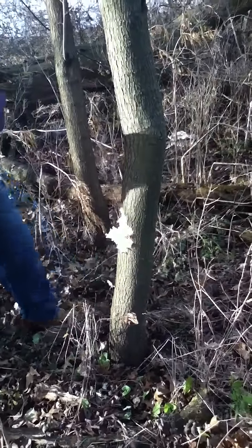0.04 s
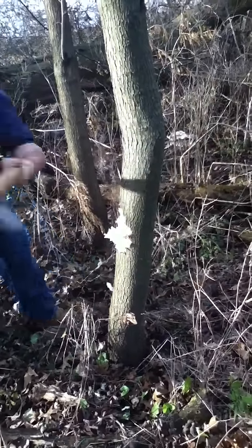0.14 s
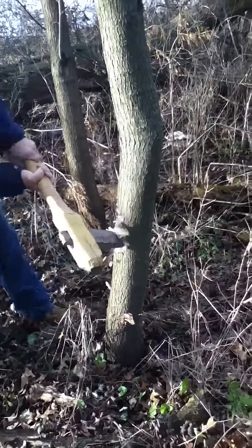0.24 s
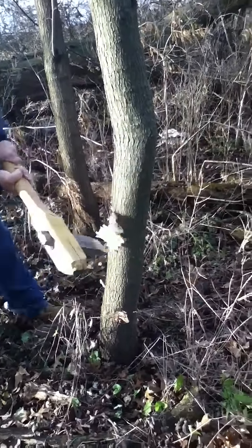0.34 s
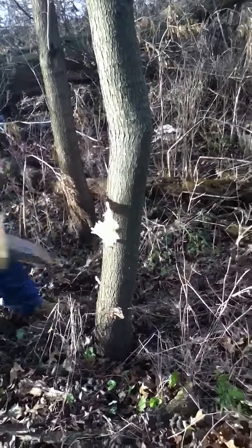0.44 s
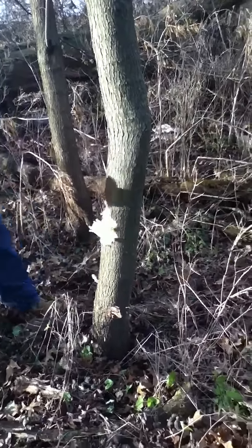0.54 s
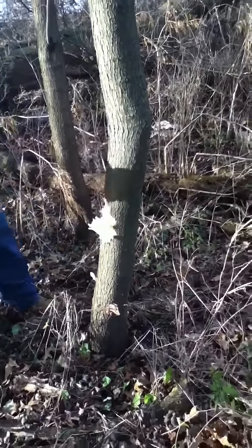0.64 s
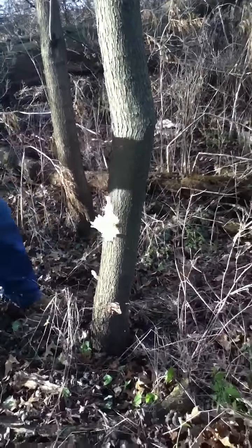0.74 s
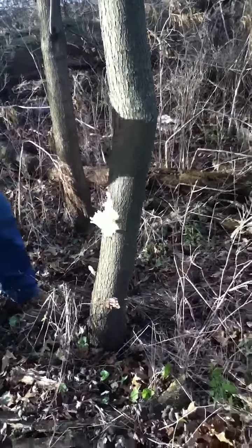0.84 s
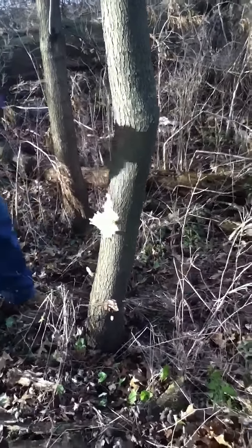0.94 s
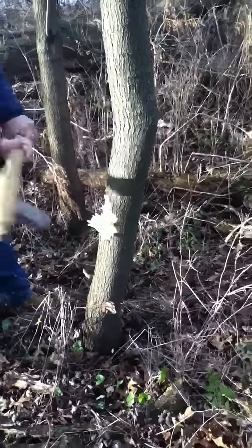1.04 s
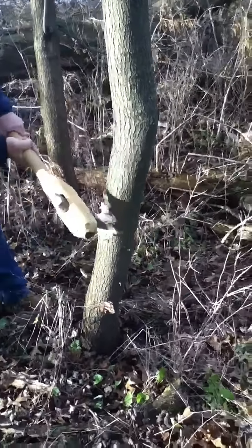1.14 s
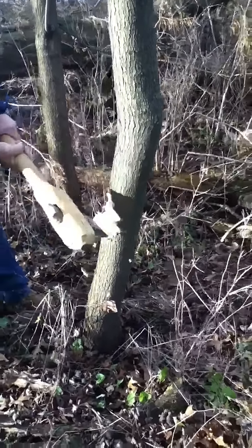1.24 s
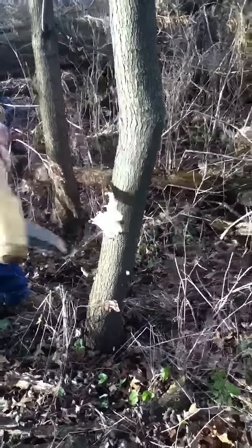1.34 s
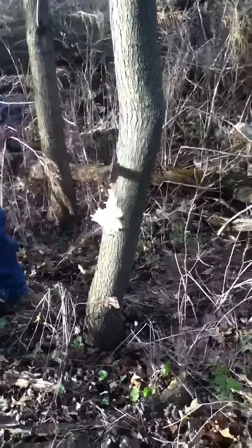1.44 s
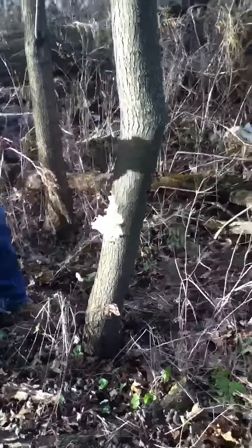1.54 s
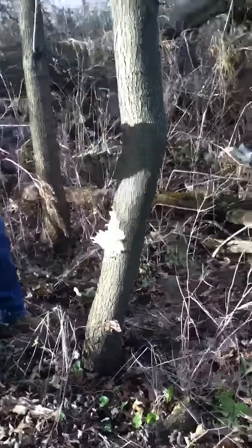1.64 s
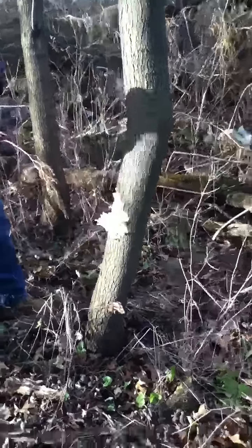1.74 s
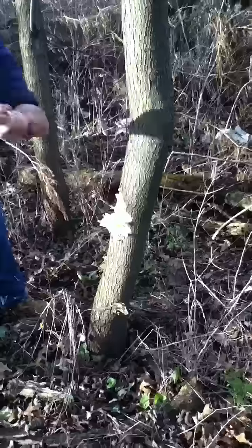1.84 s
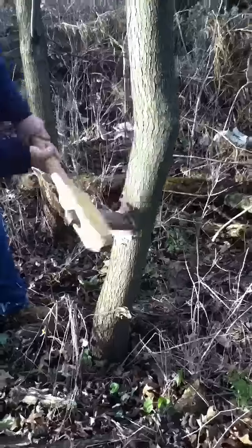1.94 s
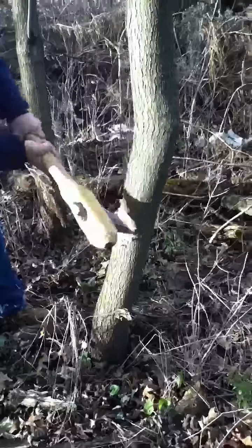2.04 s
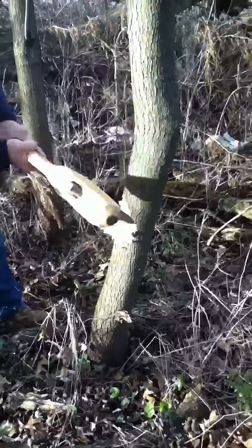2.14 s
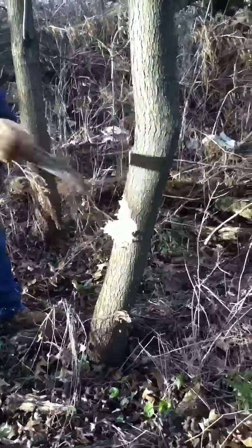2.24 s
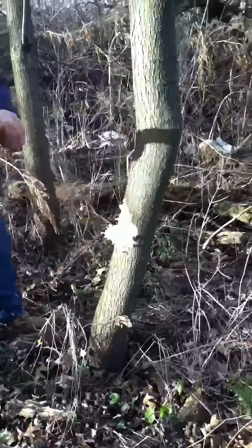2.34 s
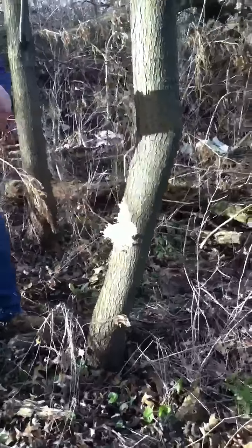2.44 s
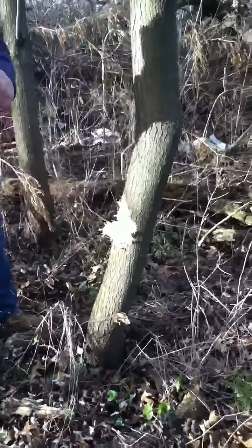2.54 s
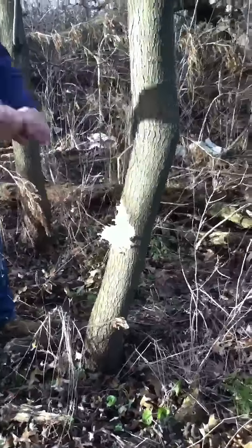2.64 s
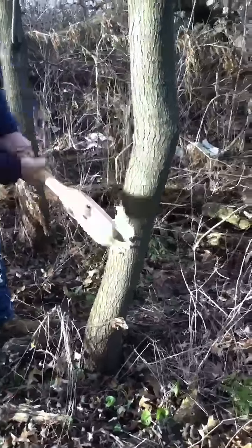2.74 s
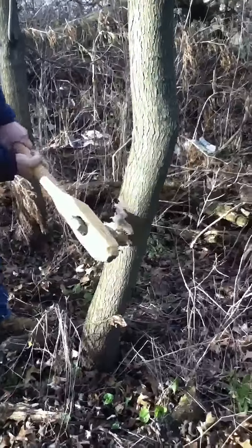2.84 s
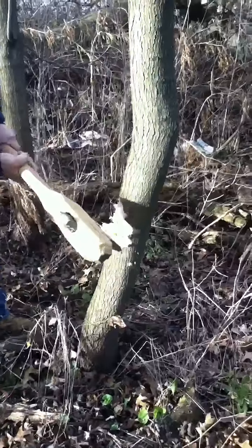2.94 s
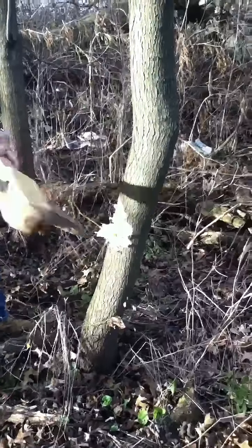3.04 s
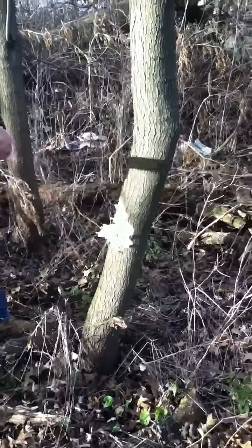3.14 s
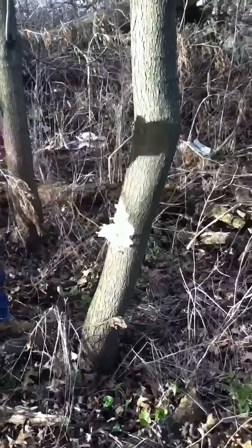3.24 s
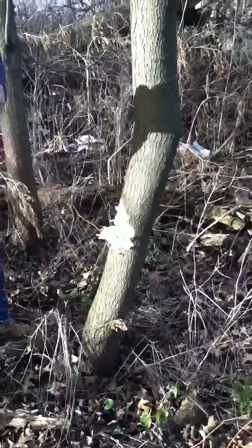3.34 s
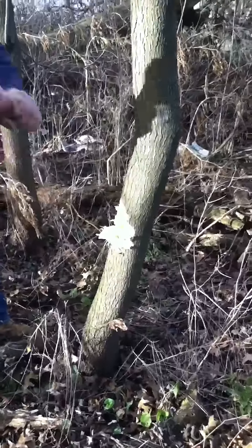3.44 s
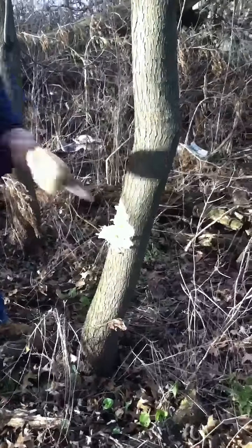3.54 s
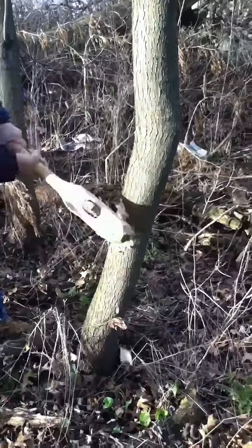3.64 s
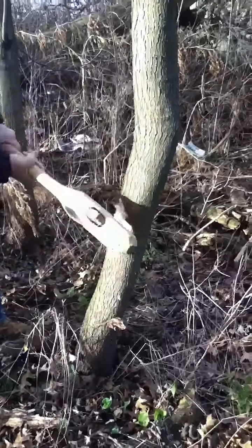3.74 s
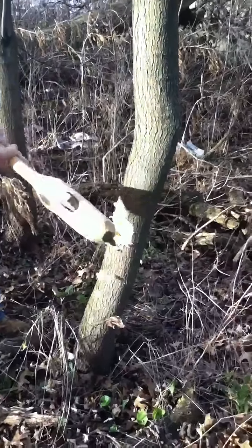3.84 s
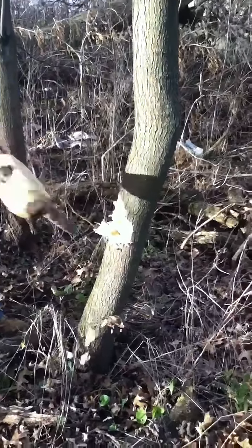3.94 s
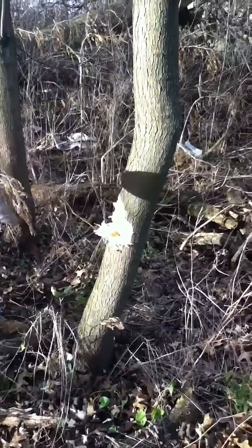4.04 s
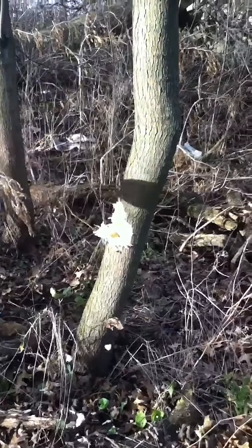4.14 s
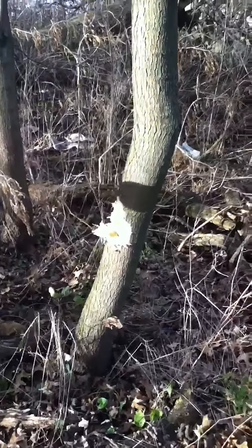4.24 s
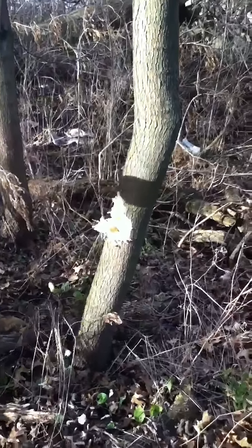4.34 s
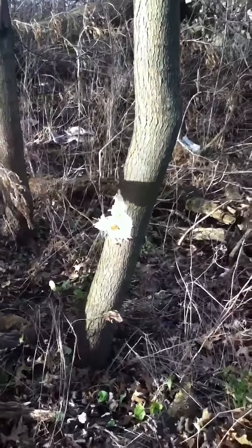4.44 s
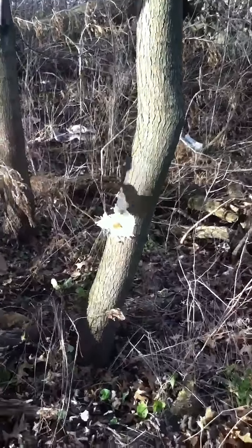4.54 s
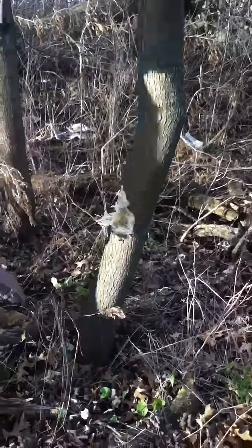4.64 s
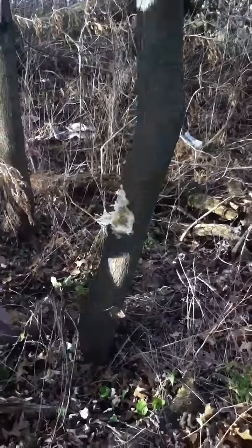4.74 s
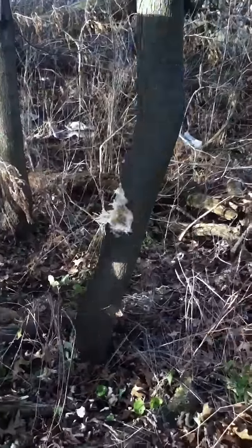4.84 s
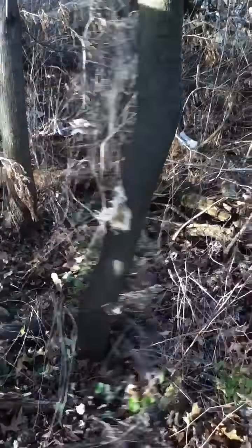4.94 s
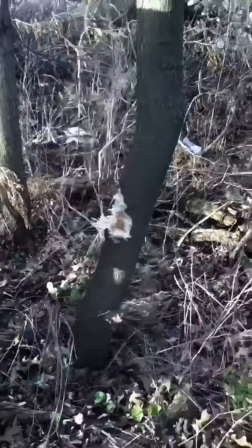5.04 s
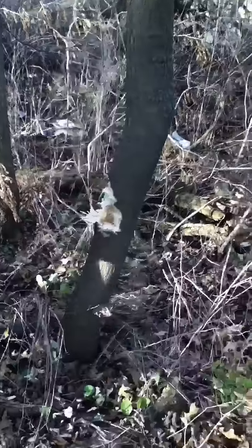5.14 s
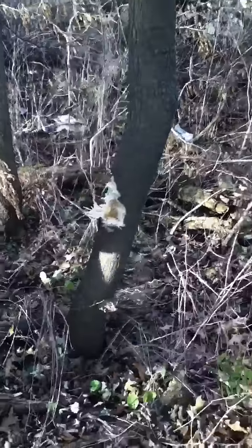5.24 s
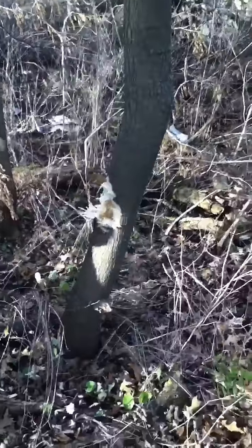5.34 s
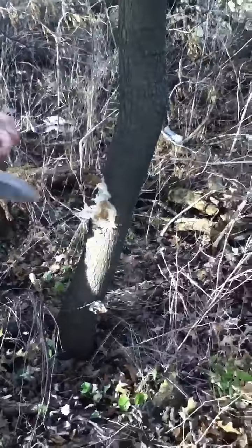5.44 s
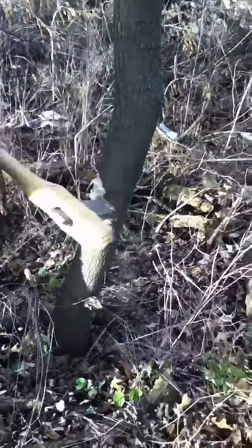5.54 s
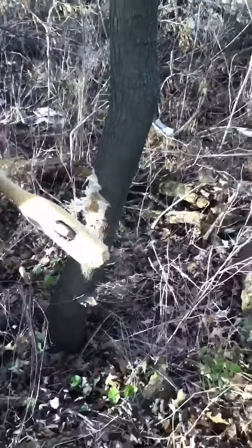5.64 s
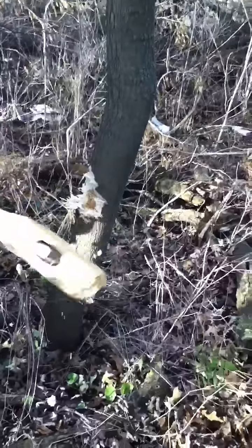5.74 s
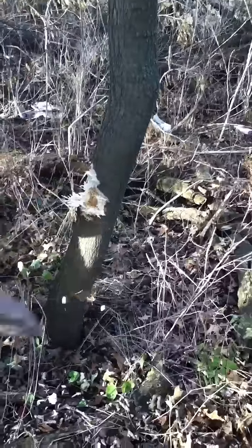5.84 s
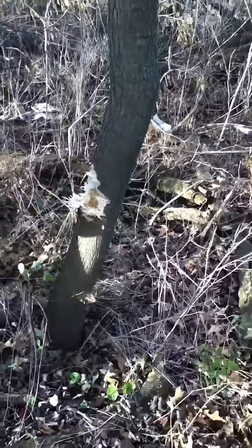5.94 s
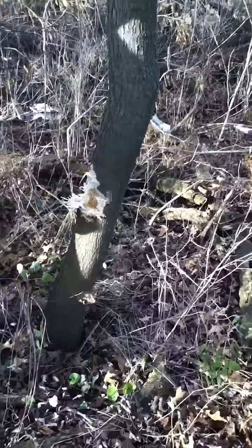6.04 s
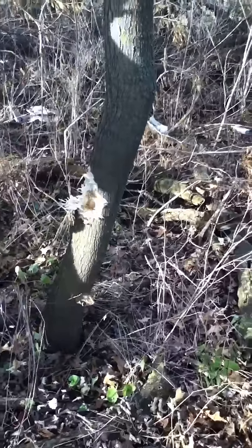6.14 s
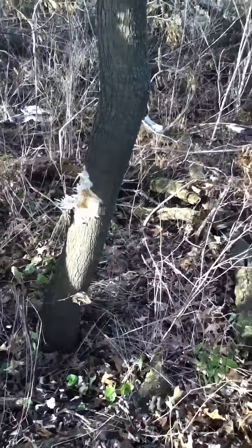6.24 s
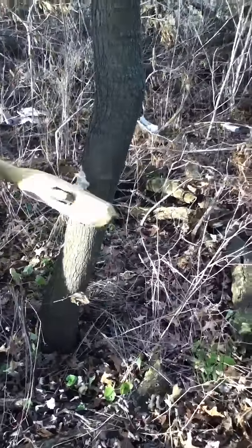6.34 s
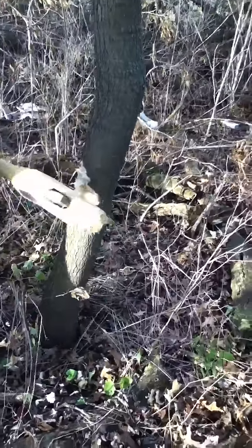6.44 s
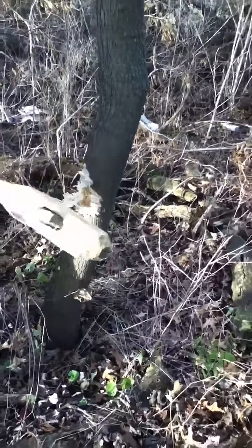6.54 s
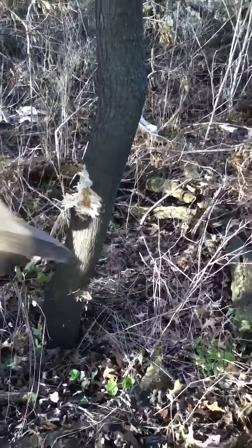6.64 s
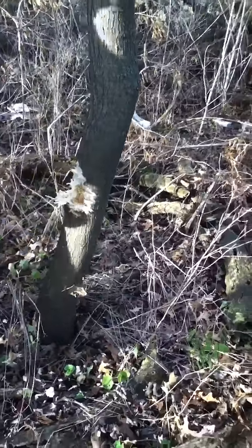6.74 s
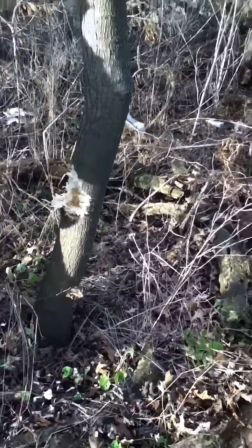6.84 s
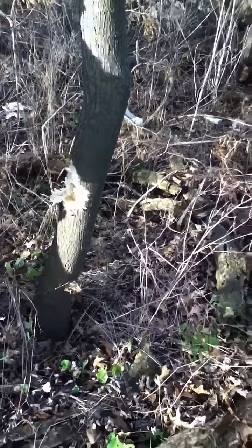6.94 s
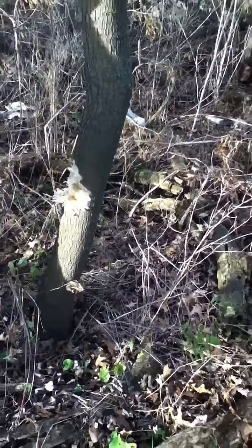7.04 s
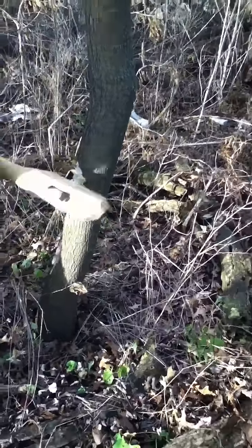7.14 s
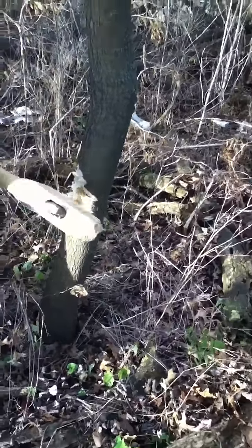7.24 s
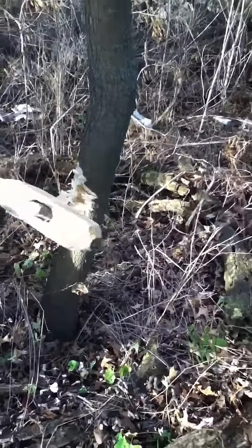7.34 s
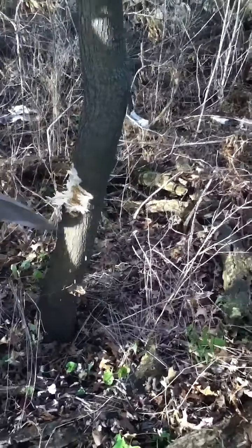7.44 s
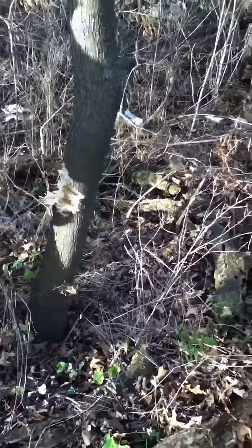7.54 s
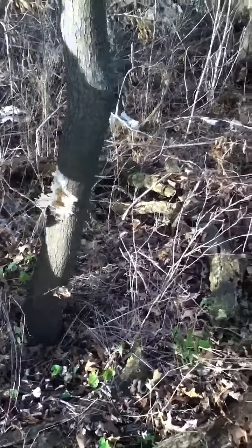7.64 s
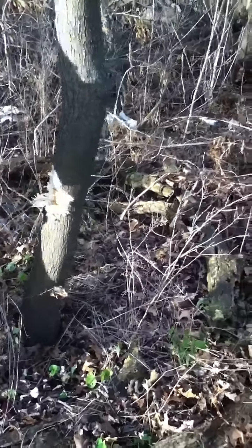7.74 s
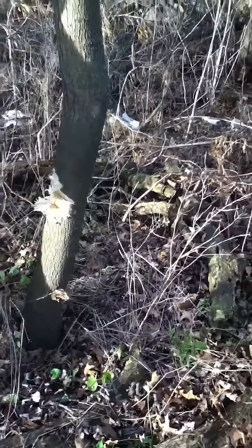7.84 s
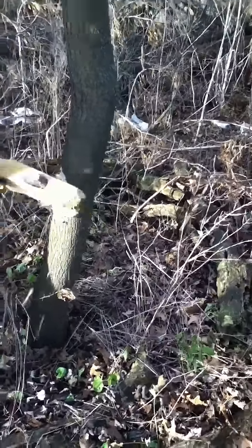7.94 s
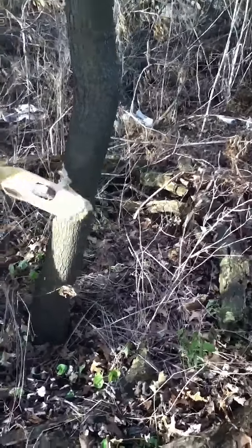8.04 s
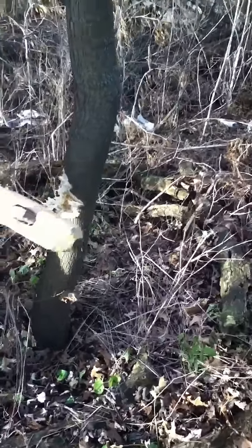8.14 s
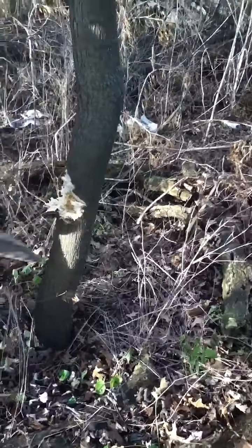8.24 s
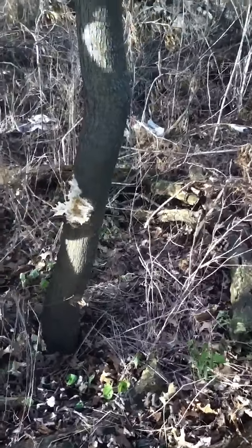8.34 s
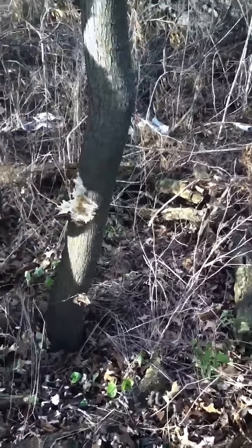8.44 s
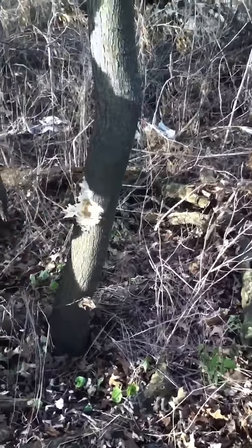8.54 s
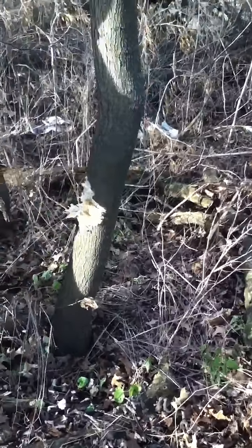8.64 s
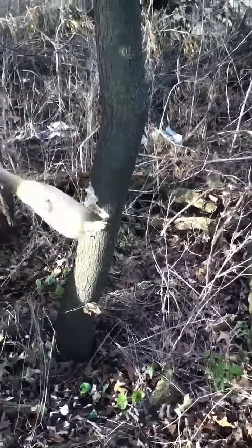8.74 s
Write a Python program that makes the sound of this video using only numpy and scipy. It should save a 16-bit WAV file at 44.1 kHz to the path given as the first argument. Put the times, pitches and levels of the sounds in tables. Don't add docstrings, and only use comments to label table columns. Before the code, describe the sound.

Close in quiet woodland, an axe bites a small trunk with five loud, short, woody knocks at a steady pace, the fifth softer. A pause follows, filled with feet dragging through dry leaves and brittle twig snaps, then four more blows, more splintery at first. Chips tick and patter down after the hits. Faint traffic hum lies behind; a phone two metres away slightly flattens the peaks.

```python
import sys
import numpy as np
from scipy import signal
from scipy.fft import rfft, irfft
from scipy.io import wavfile
from scipy.ndimage import uniform_filter1d

SR = 44100
rng = np.random.default_rng(int(sys.argv[2]) if len(sys.argv) > 2 else 0)


def decibels_to_gain(level_db):
    exponent = np.asarray(level_db, float) / 20
    return 10 ** exponent


def master_out(mix):
    frames = np.transpose(np.atleast_2d(mix))
    ceiling = np.clip(frames, -1, 1)
    pcm = np.round(ceiling * 32767).astype(np.int16)
    wavfile.write(sys.argv[1], SR, pcm)


N = 387198

# start_s, peak_db, haft_hz, blade_hz, splinter_db (re peak)
BLOWS = [
    (.3610, -0.5, 870, 1600, -24.5),
    (1.2139, -1, 950, 1645, -24),
    (2.0586, 0, 1043, 1814, -23.5),
    (2.8840, -3.5, 629, 1430, -20.5),
    (3.7117, -6.5, 1050, 1700, -14),
    (5.6510, -0.5, 866, 1405, -9.5),
    (6.4698, -4, 862, 1414, -6.5),
    (7.2664, -3.5, 846, 1294, -20),
    (8.0515, -1.5, 920, 1486, -14.5),
]


def unit(x):
    return x / np.sqrt(np.mean(x ** 2))


def curve(table):
    s, *columns = np.transpose(table)
    return [np.interp(np.arange(N) / SR, s, c) for c in columns]


def colour(x, table):
    hz, db = np.transpose(table)
    log_hz = np.log(np.arange(1, len(x) // 2 + 2) * SR / len(x))
    gain = decibels_to_gain(np.interp(log_hz, np.log(hz), db, right=-80))
    return unit(irfft(rfft(x) * gain, len(x)))


def band(x, hz, width):
    b, a = signal.iirpeak(min(hz, .4 * SR), 1 / max(width, .02), SR)
    return signal.lfilter(b, a, x)


def ring(hz, t60, sag=0., size=8192):
    t = np.arange(size) / SR
    turns = np.cumsum(hz * (1 - sag * np.clip(t / .002, 0, 1.5))) / SR
    return np.sin(2 * np.pi * turns) * np.exp(-np.log(1000) * t / t60)


def add(out, s, x):
    i = int(s * SR)
    out[i:i + len(x)] += x[:N - i]


def walk(rate):
    k = int(SR / rate)
    steps = np.repeat(rng.standard_normal(N // k + 1), k)
    return unit(uniform_filter1d(uniform_filter1d(steps, k), k)[:N])


def burst(hz, width, rise, t60, grit_db, size=4096):
    t = np.arange(size) / SR
    grains = rng.standard_normal(size) * decibels_to_gain(grit_db * rng.exponential(size=size))
    envelope = (1 - np.exp(-t / rise)) * np.exp(-np.log(1000) * t / t60)
    x = band(grains * envelope, hz, width)
    return x / np.abs(x).max()


def distance():
    # pitch_hz, density_db (per Hz)
    air_spectrum = [(13, -59), (22, -20), (74, -4.5), (454, -10), (535, -12.5), (649, -11), (1010, -14.5),
                    (1290, -16), (1520, -17.5), (1750, -13.5), (3480, -17), (6370, -13.5), (15800, -21.5)]
    # time_s, level_db
    hum_levels = [(0, -62.5), (.27, -59.5), (.78, -70), (1.15, -67), (1.5, -71), (1.96, -62.5),
                  (2.37, -67.5), (3.3, -68), (4.5, -67), (4.85, -61), (5.5, -61), (5.95, -69), (6.58, -62),
                  (6.89, -69), (7.3, -65), (7.6, -70), (8.78, -67)]
    air = colour(rng.standard_normal(N), air_spectrum) * decibels_to_gain(-55.5)
    low = signal.sosfilt(signal.butter(2, 170, fs=SR, output="sos"), air)
    swell, flutter = decibels_to_gain(.7 * walk(5)), decibels_to_gain(2.5 * walk(9))
    hum = unit(low) * decibels_to_gain(curve(hum_levels)[0] + 5.0) * flutter
    return (air - low) * decibels_to_gain(-1.5) * swell + hum


def treading():
    # peak_s, peak_db, swell_s (over 20 dB), fade_s (over 20 dB)
    scuffs = [(0.123, -25.5, 0.3, 0.1169), (.34, -44.5, 0.1, .25), (.65, -52, 0.1, 0.2),
              (.96, -44, .38, 0.06), (1.04, -42.5, .07, 0.18), (1.655, -49, 0.13, .05),
              (1.726, -48.5, .11, .15), (1.894, -54.5, 0.2, 0.3), (2.034, -50, .18, .03),
              (2.52, -57.5, 0.3, 1.2), (3.295, -51.5, 0.07, .1), (3.358, -47.5, .08, .04),
              (3.56, -57, 0.1, 0.2), (4.19, -46.5, .5, 0.8), (4.3, -44.5, .04, 0.3),
              (4.485, -35.5, 0.26, 0.13), (4.669, -29, 0.1161, 0.19), (4.789, -28.5, .3, .045),
              (5.063, -32, 0.25, 0.2951), (5.363, -38.5, 0.1, 0.42), (5.545, -46, 0.2, 0.22),
              (6.1, -47, 0.1, 0.04), (6.42, -53, .55, 0.4), (6.594, -44, 0.1, 0.12), (6.858, -43, .18, .26),
              (7.22, -55, 0, 0.5), (7.49, -44.5, .08, 0.38), (7.85, -39, .1, 0.31),
              (7.968, -31.5, 0.2047, .075), (8.6, -57.5, .5, 0.2)]
    still_db = -69.5
    lag_s, shower_db, swell_s, fade_s = .06, -52, 0.082, .27
    showers = [(blow[0] + lag_s, shower_db, swell_s, fade_s) for blow in BLOWS]
    t = np.arange(0, N + 64, 64) / SR
    power = decibels_to_gain(2 * still_db)
    for s, db, swell, fade in [*scuffs, *showers]:
        drop_db = 20 * np.maximum((s - t) / swell, (t - s) / fade)
        power = power + decibels_to_gain(2 * db - 2 * drop_db)
    return np.interp(np.arange(N) / SR, t, 10 * np.log10(power))


def leaf_grains(grit_db):
    return rng.standard_normal(N) * decibels_to_gain(grit_db * uniform_filter1d(rng.exponential(size=N), size=9))


def leaves():
    # pitch_hz, density_db (per Hz)
    leaf_spectrum = [(88, -42), (150, -11.5), (354, -9), (421, -10.5), (575, -7), (771, -10), (1070, -7.5),
                     (1470, -7), (3590, -4.5), (8810, -8.5), (15800, -14.5)]
    level_db = treading()
    crackle = colour(leaf_grains(6.0) * decibels_to_gain(1.0 * walk(70)), leaf_spectrum)
    bright = unit(band(crackle, 7800, 1.39))
    patches = decibels_to_gain(1.5 * walk(50))
    heavy_db = -8 - 0.31 * (level_db + 45.5)
    heavy = unit(band(colour(leaf_grains(5.4), leaf_spectrum), 1100, 2.23)) * decibels_to_gain(heavy_db) * patches
    return decibels_to_gain(level_db + 1.3 * walk(35)) * (bright + heavy)


def crumbs():
    out = np.zeros(N)
    per_s, level_db = 45, -55
    for when, pitch, size in rng.random((int(per_s * N / SR), 3)):
        patter = burst(800 * 5 ** pitch, .5, 0.0018, .03, 1.5, size=1024)
        add(out, when * N / SR, decibels_to_gain(level_db + 9 * size) * patter)
    return out


def debris():
    # start_s, peak_db, colour_hz
    twig_snaps = [(0.1027, -11, 3700), (0.223, -33.5, 7770), (0.2397, -43, 4470), (1.7728, -30.5, 2590),
                  (4.8094, -6, 10270), (4.8184, -10, 7770), (4.822, -10, 9280), (5.0674, -13.5, 3450),
                  (5.5422, -17, 10800), (5.548, -22, 6660), (5.886, -25, 5700), (7.216, -31, 2760),
                  (8.2068, -22.5, 7170)]
    # start_s, peak_db, pitch_hz, t60_s
    foot_thuds = [
        (.255, -37, 110, .08),
        (1.733, -34, 88, 0.12),
        (1.79, -43, 90, .1),
        (5.06, -29.5, 111, 0.06),
        (5.062, -30, 190, 0.048),
        (5.065, -34, 330, .04),
        (5.066, -34, 617, 0.028),
        (5.067, -36, 900, .025),
        (7.05, -43, 80, .12),
        (6.13, -48, 65, .12),
    ]
    # start_s, peak_db, colour_hz, t60_s
    chip_landings = [(0.4845, -35, 2620, 0.04), (0.522, -33.5, 1480, 0.03), (1.118, -33, 4950, 0.03),
                     (1.5095, -40.5, 1410, 0.057), (1.6422, -29, 1640, 0.024), (1.8522, -35, 3300, 0.018),
                     (3.2895, -30, 5080, 0.04), (3.332, -41, 3020, 0.04), (3.8373, -35, 7100, 0.045),
                     (3.892, -23.5, 4750, 0.057), (3.9602, -26.5, 5150, 0.058),
                     (4.0372, -30.5, 3830, 0.058), (4.191, -25, 5650, 0.045), (4.2237, -28, 4370, 0.037),
                     (4.2976, -28, 7890, 0.03), (4.327, -30, 5880, 0.045), (4.6473, -17, 6600, 0.019),
                     (4.8313, -22.5, 7560, 0.026), (5.452, -27, 6620, 0.026), (5.4876, -26.5, 4020, 0.031),
                     (5.85, -34, 1410, 0.049), (6.096, -31, 5700, 0.05), (6.5162, -25, 2200, 0.042),
                     (6.585, -26.5, 5430, 0.022), (6.5922, -27, 2764, 0.062), (7.38, -24.5, 6000, 0.06),
                     (7.4779, -33, 3700, 0.045), (7.636, -31.5, 4500, 0.038), (8.2563, -31.5, 5040, 0.045),
                     (8.5902, -38, 5260, 0.055)]
    # start_s, peak_db, pitch_hz, t60_s
    branch_ticks = [(1.945, -50, 720, 0.023), (2.25, -40, 2250, 0.036), (2.30, -42.5, 2300, 0.083),
                    (3.185, -44, 1400, 0.03), (5.985, -41, 2150, 0.041), (6.02, -42, 2150, .04),
                    (6.059, -46, 1030, 0.037), (6.234, -48, 1900, 0.029), (7.12, -49, 644, 0.13),
                    (.792, -42, 1260, .03), (6.768, -40, 2130, 0.047), (8.35, -44, 2240, .04),
                    (7.855, -33, 1670, .02), (7.913, -26, 3600, .025), (5.775, -38, 2500, 0.054),
                    (5.95, -44, 1200, .04)]
    out = np.zeros(N)
    for s, db, hz in twig_snaps:
        add(out, s, decibels_to_gain(db) * burst(hz, 1.1, .0001, 0.0069, 4.6))
    for s, db, hz, t60 in foot_thuds:
        onset = 1 - np.exp(-np.arange(8192) / SR / (.2 * t60))
        add(out, s, decibels_to_gain(db + 6) * ring(hz, t60) * onset)
    for s, db, hz, t60 in chip_landings:
        add(out, s, decibels_to_gain(db) * burst(hz, 1.1, .001, t60, 2.5))
    for s, db, hz, t60 in branch_ticks:
        add(out, s, decibels_to_gain(db) * burst(hz, 0.12, 0.0028, t60, 0.88, size=8192))
    return out


def axe():
    # drive_s, blade_db (re haft), knock_db (re haft), knock_hz, sag_share
    bites = [(.0026, 7.5, 0.5, 580, .055), (.0022, 3, -7.5, 650, 0.048), (.0022, 2.5, -3.5, 510, 0.31),
             (0.0031, -1, -5.5, 273, 0.093), (.0013, 0.5, -8, 910, .028), (.0043, 5, 8, 490, 0.045),
             (.0036, -5.5, -4, 533, .036), (.0042, -3, -6, 480, .024), (0.0051, 4.5, 10, 510, 0.022)]
    # start_s, peak_db, pitch_hz, length_s
    bark_grazes = [(0.36, -15.5, 2190, 0.00094), (2.057, -17, 2000, .0015), (2.8787, -11, 1840, 0.0034),
                   (3.708, -17.5, 2450, 0.0036), (3.711, -10.5, 2240, .002), (3.7126, -9.5, 1310, 0.0014),
                   (3.716, -17, 697, 0.0026), (8.0485, -29, 1980, 0.0066)]
    # pitch_hz, level_db, t60_s
    trunk_modes = [(85, -34, .1), (122, -31, .22), (165, -32, .08), (198, -23, .06), (250, -24, .055),
                   (700, -29, .035), (930, -30, .035)]
    # pitch_hz, level_db
    blade_modes = [(4390, 0.5), (5110, -4.5), (2580, -8), (2150, -6)]
    out, t = np.zeros(N), np.arange(8192) / SR
    stone = sum(decibels_to_gain(g) * ring(f, 0.013) for f, g in blade_modes) * np.clip(t / 0.00079, 0, 1)
    for blow, (drive, blade_db, knock_db, knock_hz, sag) in zip(BLOWS, bites):
        s, db, haft_hz, blade_hz, splinter_db = blow
        contact = np.clip(t / 0.00081, 0, 1) * np.exp(-np.clip(t - drive, 0, 1) / .0008)
        head = ring(haft_hz, 0.11, sag) - decibels_to_gain(blade_db) * ring(blade_hz, 0.043, sag)
        head = head + decibels_to_gain(knock_db) * ring(knock_hz, 0.035)
        crush = burst(790, 0.4, 0.0021, 0.063, 0.92, size=len(t))
        add(out, s, decibels_to_gain(db) * contact * (head / np.abs(head).max() + decibels_to_gain(-3.5) * crush))

        luck = rng.standard_normal((len(trunk_modes), 2))
        trunk = sum(decibels_to_gain(g + 2.0 * a) * ring(f * (1 + .04 * b), t60)
                    for (f, g, t60), (a, b) in zip(trunk_modes, luck))
        thump_db, fibre_db = -4 + 900 * drive, -13.5 - 1000 * drive
        add(out, s + 0.0035, decibels_to_gain(thump_db) * trunk * np.clip(t / .003, 0, 1))
        fibres = band(burst(670, 1.8, 0.0012, 0.10, 1.5, size=len(t)), 890, 1.9)
        add(out, s + .002, decibels_to_gain(db + fibre_db) * fibres)
        add(out, s + .0012, decibels_to_gain(db + splinter_db + 0.5) * stone)
        splinters = burst(3600, 1.0, 0.00077, 0.022, 3.3)
        add(out, s + 0.00038, decibels_to_gain(db + splinter_db - 3.5) * splinters)
    for s, db, hz, length in bark_grazes:
        add(out, s, decibels_to_gain(db) * burst(hz, .7, length, 6 * length, 1.0))
    return out


def woodland(x):
    # delay_s, level_db, colour_hz, width_share
    echo_paths = [
        (.0045, -27, 1400, 1.5),
        (.024, -38, 200, .5),
        (.047, -32, 2170, .3),
        (.122, -39, 2300, .7),
        (.197, -42, 2200, .7),
        (.3, -44, 2200, .8),
    ]
    size = SR // 2
    t = np.arange(size) / SR
    decay = np.exp(-np.log(1000) * t / 0.79)
    tail = decibels_to_gain(-63.5) * rng.standard_normal(size) * decay * np.clip(t / .01, 0, 1)
    near, far = np.zeros(size), np.zeros(size)
    for delay, db, hz, width in echo_paths:
        smear = band(burst(hz, width, .0001 + .06 * delay, .001 + .6 * delay, .5), hz, width)
        i = int(delay * SR)
        side = near if delay < .04 else far
        side[i:i + len(smear)] += decibels_to_gain(db) * smear / np.sqrt(np.sum(smear ** 2))
    far = signal.sosfilt(signal.butter(4, 1950, "high", fs=SR, output="sos"), far)
    return signal.fftconvolve(x, tail + near + far)[:N]


def clatter():
    out = np.zeros(N)
    level_db, hz, t60_s = -37, 1500, .45
    for s, *_ in BLOWS:
        rattle = band(burst(hz, 1.3, .03, t60_s, 4.5, size=16384), hz, 1.6)
        add(out, s + .03, decibels_to_gain(level_db) * rattle)
    return out


def scene():
    blows = axe()
    ground = leaves() + crumbs() + debris()
    return (distance() + ground + blows + woodland(blows) + clatter())[None]


def top_cut(x):
    return signal.sosfilt(signal.butter(12, 17000, fs=SR, output="sos"), x)


def record(dry):
    ceiling, knee = .71, 6
    heard = signal.sosfilt(signal.butter(2, 50, "high", fs=SR, output="sos"), dry)
    heard = heard / (1 + np.abs(heard / ceiling) ** knee) ** (1 / knee)
    heard = signal.sosfilt(signal.butter(10, 15700, fs=SR, output="sos"), heard)
    return top_cut(heard)


dry = scene()
out = record(dry)
master_out(out)
```